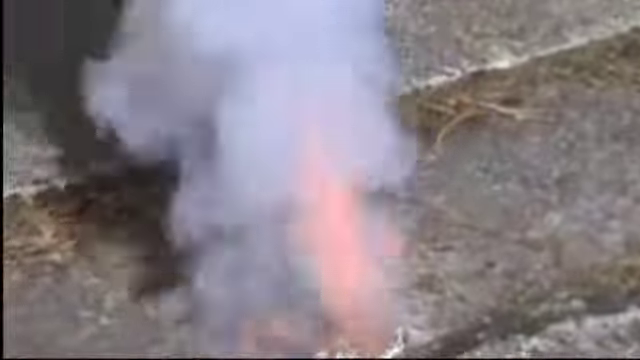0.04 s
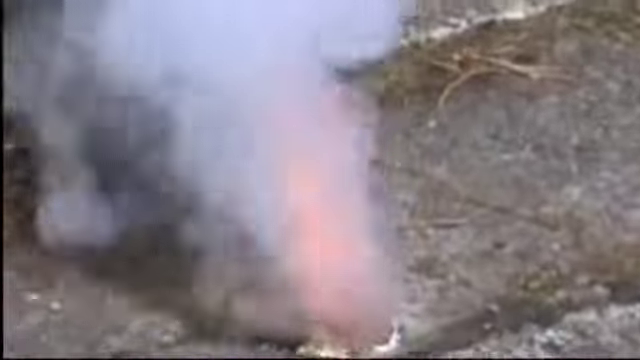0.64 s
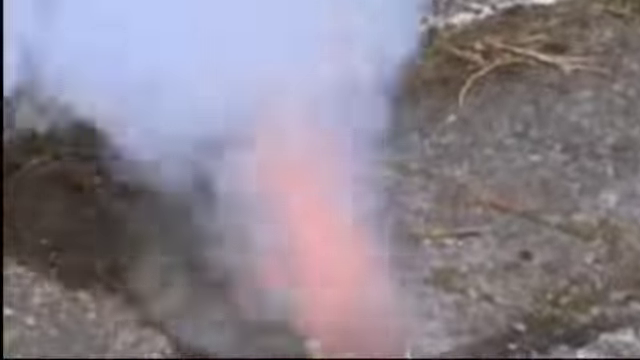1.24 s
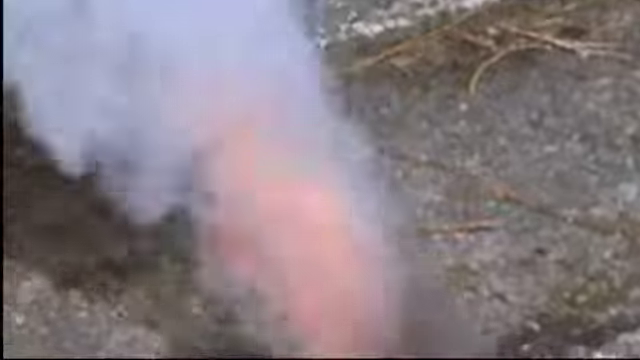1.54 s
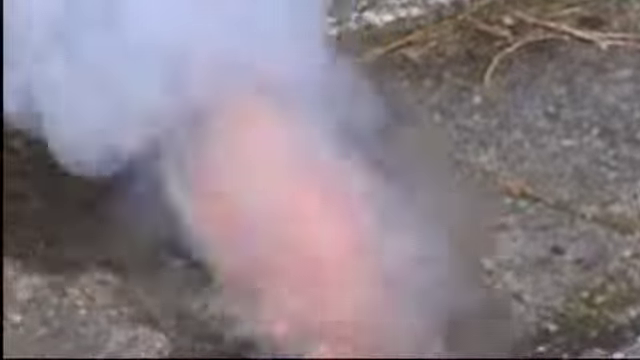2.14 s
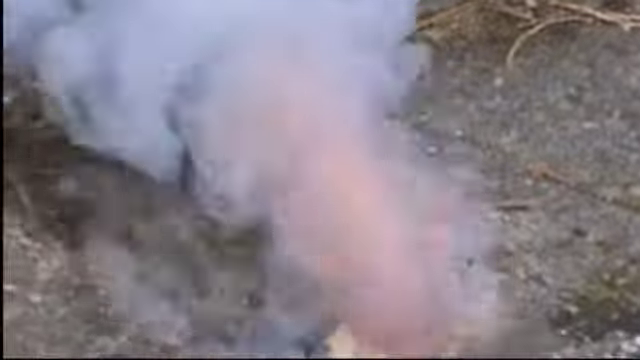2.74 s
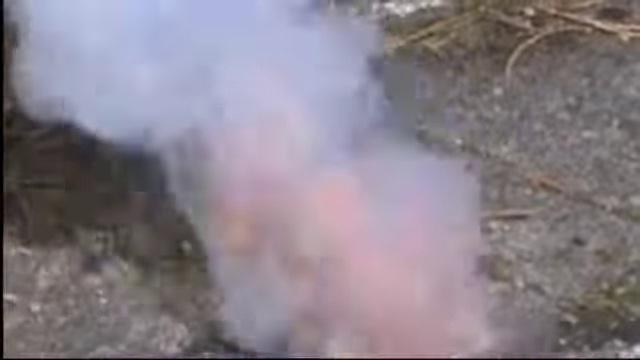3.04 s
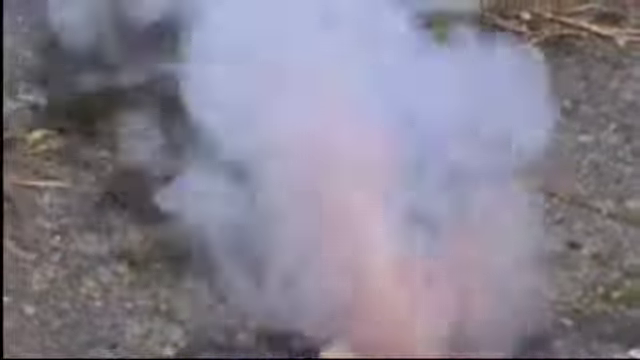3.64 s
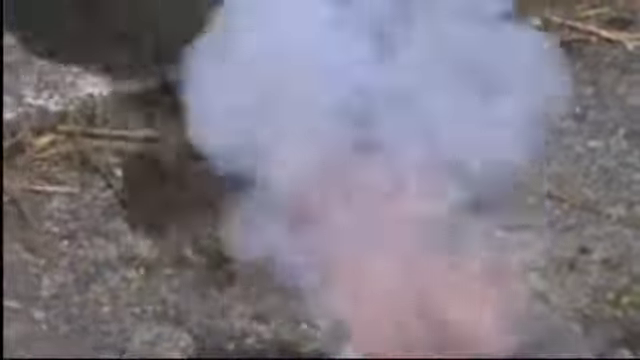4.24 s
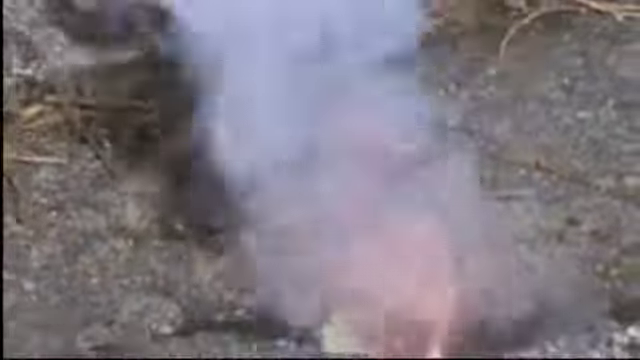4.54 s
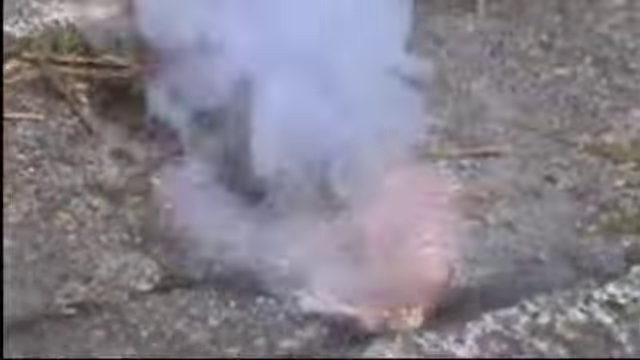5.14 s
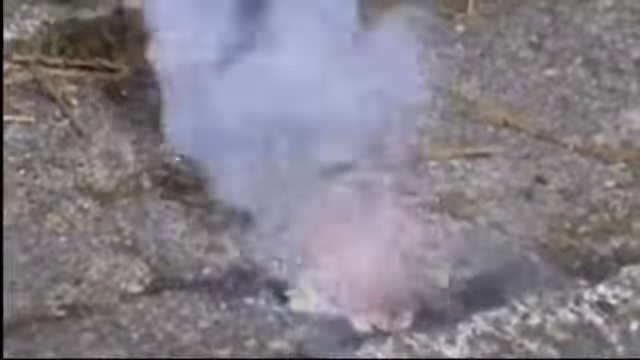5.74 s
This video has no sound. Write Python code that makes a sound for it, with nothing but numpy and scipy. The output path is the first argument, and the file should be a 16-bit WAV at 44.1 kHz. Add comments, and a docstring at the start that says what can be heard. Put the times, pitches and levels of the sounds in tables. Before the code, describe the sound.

Deep, uneven wind rumble thumps against a close microphone outdoors while a smoke bomb roars, fizzes and hisses on the ground. The jet starts bright, chokes, then runs free again. After the midpoint it turns duller, with a ragged fizz and short, sharp spits over the continuing roar, which swells briefly toward the end. The strongest gusts now and then overload the microphone.

```python
"""A smoke bomb burns on pavement, close to a hand-held microphone in gusty wind.
From the start the plume roars, the charge fizzes and the vent hisses, its jet running free.
The vent chokes by 1.7 s, runs free again from 1.8 s and chokes again after 3 s; the fizz thins and spits.
Near 5.4 s roar and fizz swell briefly. Throughout, wind buffets the two microphone ports
with a deep rumble that now and then overloads them."""
import sys
import numpy as np
from scipy import signal
from scipy.fft import rfft, irfft
from scipy.io import wavfile
from scipy.ndimage import uniform_filter1d, minimum_filter1d

SR = 44100
rng = np.random.default_rng(int(sys.argv[2]) if len(sys.argv) > 2 else 0)


def dump(signal):
    """Clip the signal to [-1, 1] and save it as 16-bit WAV at the path in sys.argv[1]."""
    limited = np.clip(np.atleast_2d(signal).T, -1, 1)
    pcm = np.round(limited * 32767).astype(np.int16)
    wavfile.write(sys.argv[1], SR, pcm)


N = 264159


def plume(roar_db, split_hz=1400):
    """The hot jet mixes with air: a broad roar whose low and high eddies flicker apart."""
    # roar spectrum: freq_hz, gain_db
    spectrum = [(250, -11), (500, -4), (800, -0.5), (1100, 2), (1600, 2), (2100, -1.5), (2600, -8.5),
                (3200, -16.5), (4500, -43), (9000, -71)]
    roar = colour(turbulence(), spectrum)
    low = signal.sosfiltfilt(signal.butter(2, split_hz, fs=SR, output="sos"), roar)
    flickering = low * undb(.75 * walk(20)) + (roar - low) * undb(.9 * walk(30))
    return flickering * undb(roar_db)


def charge(fizz_db):
    """Grains of the charge flash off in a dense fizz."""
    # fizz spectrum: freq_hz, gain_db
    spectrum = [(900, -14), (1800, -1), (2500, 1.5), (3200, -.5), (4000, -5), (5000, -13), (6300, -24),
                (8000, -39)]
    fizz = turbulence() + undb(-5) * grains(per_s=3000, spread_db=2.2)
    return colour(fizz, spectrum) * undb(fizz_db)


def sputter(fizz_db):
    """Level offset in dB: gas leaves in jerks, more ragged when the burn is weak, with sharp spits."""
    # spits of the charge: peak_s, rise_db
    spits = [(.896, 3), (2.387, 3.4), (2.51, 3), (3.137, 2.6), (3.355, 3.3), (3.575, 3), (3.608, 3.6),
             (3.707, 3.6), (3.997, 5), (4.037, 2.5), (4.06, 3), (4.283, 4), (4.412, 4.5), (4.567, 3),
             (4.588, 3), (4.656, 4), (4.811, 3), (4.938, 3.5), (5.041, 3.5), (5.166, 5.5)]
    spit_db = sum(db * swell(s, rise_s=.0026, fall_s=.005) for s, db in spits)
    ragged_db = np.interp(fizz_db, [-46, -39], [1.4, .75])
    return ragged_db * walk(45) + spit_db


def vent(hiss_db):
    """Gas squeezes through the vent: a thin, flickering hiss peppered with ash."""
    # hiss spectrum: freq_hz, gain_db
    spectrum = [(2500, -8), (4000, 3), (5500, 4.5), (7000, 0), (8500, -4.5), (9800, -12.5), (12000, -19),
                (14000, -25), (15000, -33)]
    hiss = turbulence() + undb(-8) * grains(per_s=900, spread_db=2.6)
    return colour(hiss, spectrum) * undb(hiss_db + .9 * walk(15))


def sizzle():
    """The finest sparks sizzle above the hiss, brightest while the jet flares."""
    # spark envelope: time_s, level_db
    envelope = [(0, -74), (.33, -70.5), (.55, -76), (1.45, -90), (1.7, -84), (1.8, -71), (2, -74),
                (2.12, -76), (2.35, -66), (2.7, -65), (2.85, -69), (3.7, -83), (4.3, -83.5), (5.2, -77.5),
                (5.5, -78.5), (5.95, -84)]
    # spark spectrum: freq_hz, gain_db
    spectrum = [(6500, -1.5), (8500, 3.5), (10000, -2), (12000, 0.5), (13500, 1.5), (15000, -5.5)]
    (sizzle_db,) = curves(envelope)
    sparks = turbulence() + undb(-4) * grains(per_s=1500, spread_db=3)
    return colour(sparks, spectrum) * undb(sizzle_db + walk(20))


def wind():
    """Gusts drive four bands: big eddies buffet, small ones flutter and bluster, a breeze rushes above."""
    # gust strength: time_s, level_db
    gusts = [(0, -34), (.42, -31), (.6, -33), (1.05, -36.5), (1.35, -33.5), (1.65, -37), (2, -35.5),
             (2.55, -36), (2.88, -37), (3.1, -40), (3.45, -35), (3.75, -38), (4.05, -36), (4.6, -36.5),
             (5.2, -36.5), (5.55, -35.5), (5.95, -36)]
    # thumps of the biggest eddies: peak_s, level_db, duration_factor
    big_eddies = [(.035, -5.5, 1.4), (.48, -2, 0.4), (.57, -7, 0.45), (.73, -9.5, 0.68), (.89, -15.5, 0.75),
                  (.99, -9, 0.58), (1.139, -8, 0.93), (1.321, 0.5, 0.44), (1.44, -4.5, 0.48),
                  (1.59, -6.5, 1.1), (1.879, -5.5, 0.37), (2.052, -1.5, 0.85), (2.29, -13, 0.73),
                  (2.431, -8.5, 0.83), (2.63, -2, 0.59), (2.73, -3, 0.32), (2.9, 0, 1.27),
                  (3.1, -5.5, 1.33), (3.32, -18, 4.3), (3.432, -7.5, 1.96), (3.759, -9, 0.39),
                  (3.89, -6, 0.43), (4.09, -10.5, 0.35), (4.39, -8, 0.65), (4.509, -8.5, 0.94),
                  (4.878, 3, 0.41), (5.07, -10, 0.48), (5.189, -8, 0.37), (5.311, -2, 0.51),
                  (5.822, -8, 0.63)]
    # flurries of small eddies: peak_s, level_db, half_width_s
    small_eddies = [(.3, -15.5, 0.033), (.62, -21.5, 0.19), (0.949, -17.5, 0.059), (1.53, -21.5, 0.035),
                    (2, -18, 0.07), (2.38, -27, 0.045), (2.85, -12, 0.082), (3.099, -15.5, 0.11),
                    (3.371, -16, 0.035), (3.51, -20, 0.024), (3.98, -18.5, 0.035), (4.4, -22, 0.034),
                    (4.84, -21, 0.047), (5.28, -19.5, 0.059)]
    # rumble dropouts between eddies: centre_s, dip_db
    lulls = [(.425, 2.5), (.525, 7), (.65, 0.5), (.78, 0.5), (1.07, 2.5), (1.19, 2), (1.385, 2.5), (1.7, 2),
             (1.8, 3), (1.965, 5), (2.55, 5), (2.775, 7), (3, 7), (3.68, 1.5), (4.29, 3), (4.59, 6),
             (4.82, 2), (4.969, 2.5), (5.245, 5), (5.58, 5), (5.66, 5)]
    # band spectra, low to high: freq_hz, gain_db
    buffet_spectrum = [(12, -23), (16, -24), (22, -9.5), (27, -4.5), (33, 1), (42, -6), (54, -8.5),
                       (80, -41.5)]
    flutter_spectrum = [(30, -7), (46, -7), (55, -2), (66, 2), (80, -7), (100, -10.5), (130, -25),
                        (200, -39.5)]
    bluster_spectrum = [(80, -3.5), (110, 3), (150, 0.5), (200, -5.5), (280, -19), (450, -27)]
    breeze_spectrum = [(150, -1), (250, 3), (350, 1.5), (500, -3.5), (750, -4), (1200, -9.5),
                       (3000, -44.5)]

    (gust_db,) = curves(gusts)
    excess_db = gust_db - gust_db.mean()
    thumps = sum(undb(db) * swell(s, rise_s=size * .056, fall_s=size * .035) for s, db, size in big_eddies)
    flurries = sum(undb(db) * swell(s, width_s, width_s) for s, db, width_s in small_eddies)
    lull_db = sum(db * swell(s, rise_s=.014, fall_s=.014) for s, db in lulls)

    buffet_gain = np.hypot(undb(-15.5 + .33 * excess_db), thumps)
    # thumps break up into flutter, flurries into bluster
    flutter_gain = np.hypot(undb(-17 + .45 * excess_db), flurries + undb(-17) * thumps)
    bluster_gain = np.hypot(undb(gust_db + 3), undb(-16) * flurries)
    buffet = even(eddies(buffet_spectrum), span_s=.073) * buffet_gain
    flutter = even(eddies(flutter_spectrum), span_s=.22) * flutter_gain
    bluster = eddies(bluster_spectrum) * bluster_gain
    breeze = eddies(breeze_spectrum) * undb(-36.5 + .65 * excess_db + .77 * walk(8.4))
    return (buffet + flutter) * undb(-lull_db) + bluster + breeze


def eddies(spectrum):
    """One band of air turbulence at the two ports, rms 1."""
    # port response to wind: freq_hz, left_minus_right_db, coherence, left_lead_rad
    wind_ports = [(16, -14, 0.6, 0.94), (23, -2, 0.8, 0.32), (31, -1, 1, 0.11), (44.4, -2.5, 0.8, -.3),
                  (55, 7, 0.1, -1.1), (69, 8.5, 0.4, 0.14), (90.5, 9.5, 0.7, 0.58), (105, -4.5, 0.02, 0.32),
                  (137, -15.5, 0.87, 0.38), (218, -6.5, 0.05, 0.92), (490, -8, .05, 0.021)]
    return colour(ports(turbulence(), wind_ports), spectrum)


def ports(pair, response):
    """Mix two independent signals into the left and right microphone ports."""
    tilt_db, coherence, lead_rad = by_bin(response)
    coherence = np.clip(coherence, 0, 1)
    a, b = rfft(pair)
    shared = np.sqrt((1 + coherence) / 2) * a
    apart = np.sqrt((1 - coherence) / 2) * b
    left_share = 1 / (1 + undb(-tilt_db) ** 2)
    left = (shared + apart) * np.sqrt(2 * left_share)
    right = (shared - apart) * np.sqrt(2 * (1 - left_share)) * np.exp(-1j * lead_rad)
    return irfft(np.array([left, right]), N)


def turbulence():
    """Two independent white noises."""
    return rng.standard_normal((2, N))


def grains(per_s, spread_db):
    """Tiny bursts at random times: many weak, a few strong."""
    fires = rng.random(N) < per_s / SR
    size = undb(spread_db * np.minimum(rng.exponential(size=N), 5))
    return unit(fires * size * turbulence())


def walk(rate_hz):
    """Smooth random drift, rms 1."""
    hz = np.arange(N // 2 + 1) * SR / N
    return unit(irfft(rfft(rng.standard_normal(N)) / (1 + (hz / rate_hz) ** 2), N))


def swell(peak_s, rise_s, fall_s):
    """Two-sided Gaussian pulse, height 1."""
    since_s = np.arange(N) / SR - peak_s
    return np.exp(-.5 * (since_s / np.where(since_s < 0, rise_s, fall_s)) ** 2)


def even(x, span_s):
    """Divide out the running rms: eddies of equal strength."""
    span = max(int(span_s * SR), 1)
    power = np.mean(x ** 2, axis=0)
    return x / np.sqrt(uniform_filter1d(uniform_filter1d(power, span), span))


def colour(x, spectrum):
    """Shape by a spectrum, 12 dB/octave down past its ends; rms 1."""
    hz = np.maximum(np.arange(N // 2 + 1) * SR / N, 1)
    ends = np.minimum(hz / spectrum[0][0], 1) * np.minimum(spectrum[-1][0] / hz, 1)
    (gain_db,) = by_bin(spectrum)
    return unit(irfft(rfft(x) * undb(gain_db) * ends ** 2, N))


def curves(table):
    """Columns of a time table, per sample."""
    time_s, *columns = np.transpose(table)
    return [np.interp(np.arange(N) / SR, time_s, column) for column in columns]


def by_bin(table):
    """Columns of a frequency table, per Fourier bin."""
    hz, *columns = np.transpose(table)
    log_bins = np.log(np.maximum(np.arange(N // 2 + 1) * SR / N, 1))
    return [np.interp(log_bins, np.log(hz), column) for column in columns]


def undb(db):
    """Decibels to gain."""
    return 10 ** (np.asarray(db) / 20)


def unit(x):
    """Scale to rms 1."""
    return x / np.sqrt(np.mean(x ** 2))


def scene():
    """The burning bomb and the wind at the two ports."""
    # course of the burn: time_s, roar_db, fizz_db, hiss_db
    burn = [(0, -34, -37, -48.5), (.33, -35, -36, -46.5), (.53, -34, -38.5, -47.5),
            (.72, -33.5, -38.5, -48.5), (1, -32.5, -38.5, -51.5), (1.4, -32.2, -40.5, -55),
            (1.7, -31.5, -42.5, -59.5), (1.95, -31, -39, -47.5), (2.2, -31, -40.5, -51.5),
            (2.62, -32, -40.5, -48.5), (2.76, -31, -40, -52), (3.3, -31.5, -42.5, -56.5),
            (3.85, -33.5, -47, -63.5), (4.3, -33.6, -49.5, -67), (4.85, -32.6, -46, -65),
            (5.22, -32.5, -47, -62), (5.38, -30.5, -42, -63), (5.52, -31, -45, -63.5),
            (5.95, -31, -44, -66)]
    # puffs and flares of the charge: peak_s, roar_rise_db, fizz_rise_db, half_width_s
    surges = [(.11, .3, 1.8, .03), (.3, 0, 1.6, .025), (.4, 1.5, 0, .02), (.65, .5, 3, .028),
              (.81, 1.3, 1.2, .035), (2.02, .7, 1, .03), (2.13, 1.5, 0, .03), (2.2, .3, 2, .018),
              (2.35, 1.2, .5, .03), (2.44, 0, 1.8, .02), (2.66, 1.8, .5, .022), (3.37, .3, 1.5, .035),
              (4.03, .7, 3.3, .02), (4.21, .4, 1.8, .03), (4.29, 0, 2, .015), (4.53, .8, 3, .07),
              (4.85, 1.2, 2.7, .04), (4.96, 1.2, 0, .02), (5.04, 1.3, 1, .025), (5.44, 1, .5, .03),
              (5.66, 1.8, 2, .035), (5.95, 1.2, 2, .035)]
    # port response to the bomb: freq_hz, left_minus_right_db, coherence, left_lead_rad
    burn_ports = [(450, -8, .35, -1.7), (750, -7, .42, -1.55), (1100, -5, .42, -1.7),
                  (1600, -.6, .45, -2.06), (2200, .7, .5, -2.5), (3200, 1, .5, -2.87),
                  (5000, 1, .46, -3.05), (10000, 0, .62, -3.14)]
    roar_db, fizz_db, hiss_db = curves(burn)
    puff_db = sum(db * swell(s, width_s, width_s) for s, db, _, width_s in surges)
    flare_db = sum(db * swell(s, width_s, width_s) for s, _, db, width_s in surges)
    sputter_db = sputter(fizz_db)
    roar = plume(roar_db + puff_db)
    fizz = charge(fizz_db + flare_db + sputter_db)
    hiss = vent(hiss_db + .7 * flare_db + .35 * sputter_db)
    return ports(roar + fizz + hiss + sizzle(), burn_ports) + wind()


def record(dry):
    """A bass limiter eases the strongest thumps; peaks clip, the ends fade, the top is cut."""
    bass_hz, top_hz = 220, 15300
    ceiling, span = .91, int(.012 * SR)
    bass = signal.sosfiltfilt(signal.butter(4, bass_hz, fs=SR, output="sos"), dry)
    headroom = np.minimum(1, ceiling / np.maximum(np.abs(bass), 1e-9))
    gain = uniform_filter1d(minimum_filter1d(headroom, 2 * span), span)
    limited = np.clip(bass * gain + (dry - bass), -1, 1)
    edge_samples = np.minimum(np.arange(N), np.arange(N)[::-1])
    fade = np.sin(np.pi / 2 * np.minimum(edge_samples / 256, 1)) ** 2
    return signal.sosfilt(signal.ellip(8, .2, 70, top_hz, fs=SR, output="sos"), limited * fade)


dry = scene()
out = record(dry)
dump(out)
```